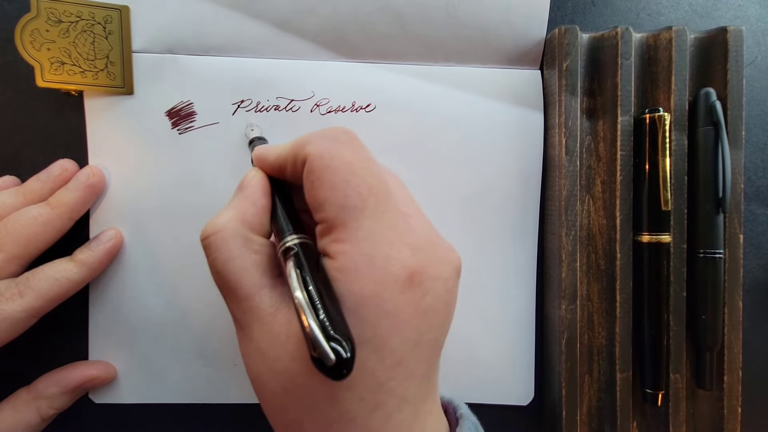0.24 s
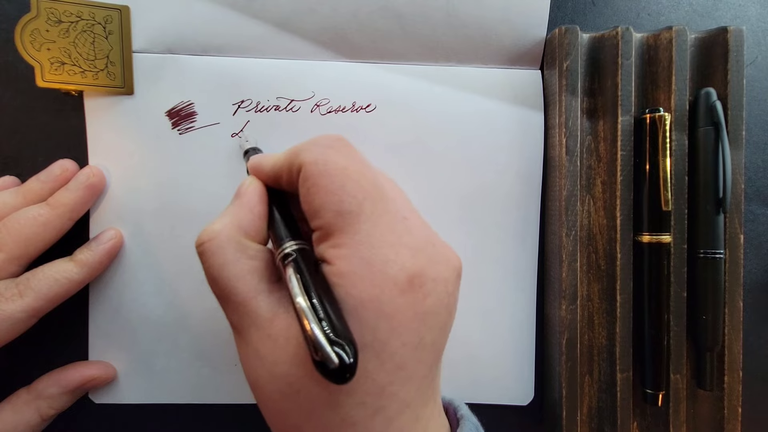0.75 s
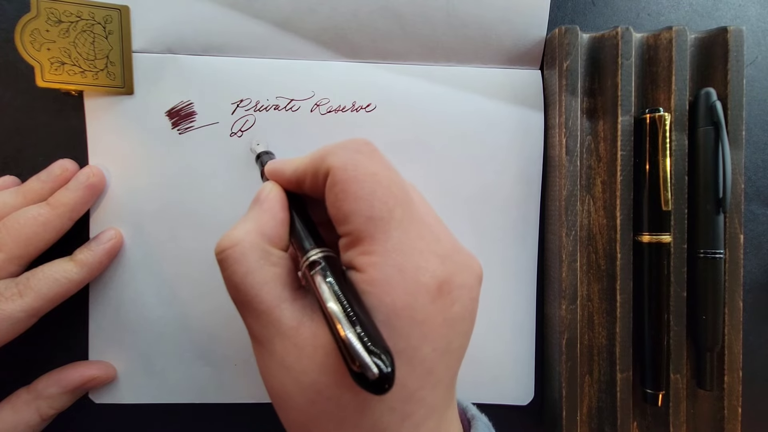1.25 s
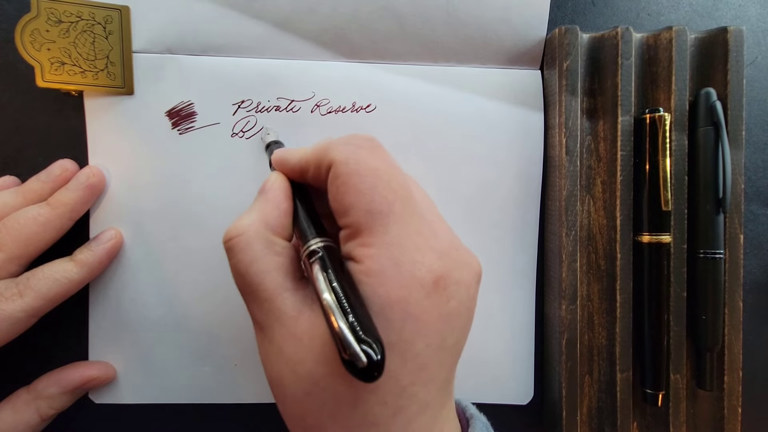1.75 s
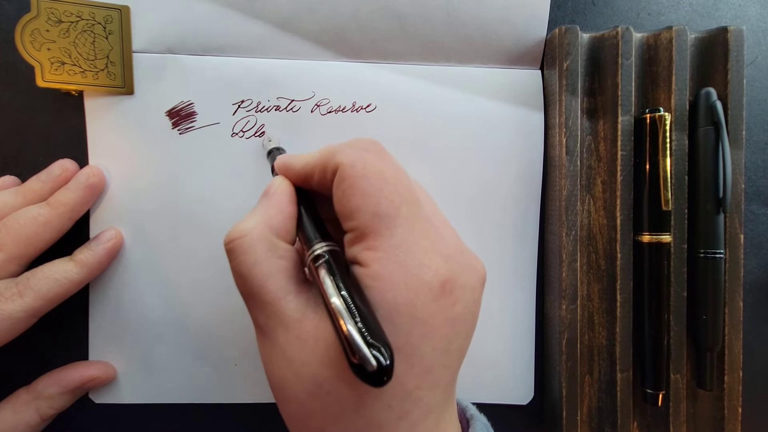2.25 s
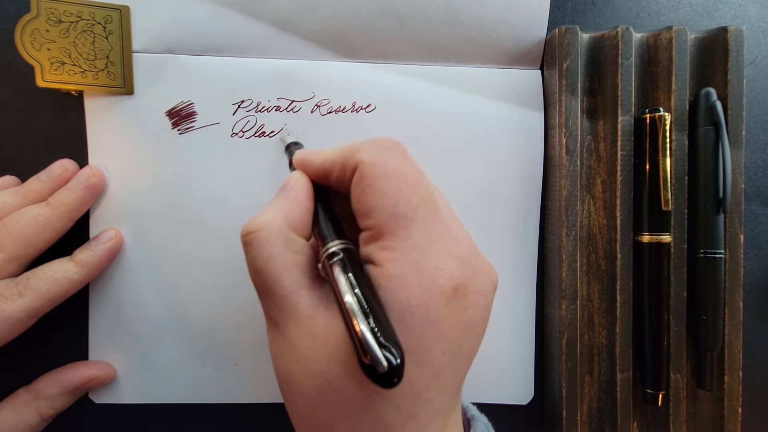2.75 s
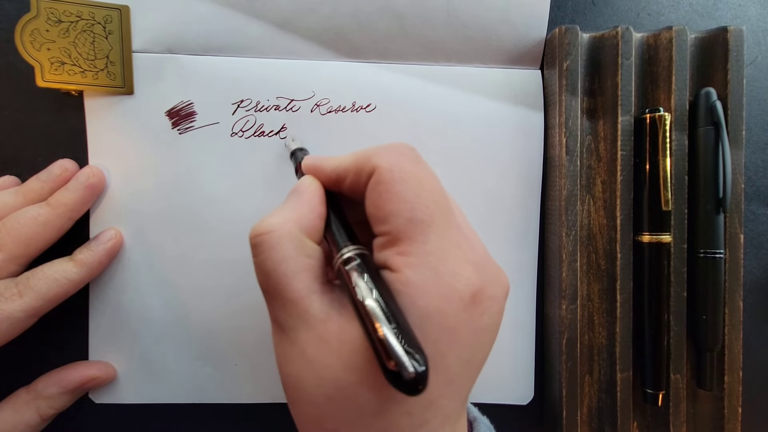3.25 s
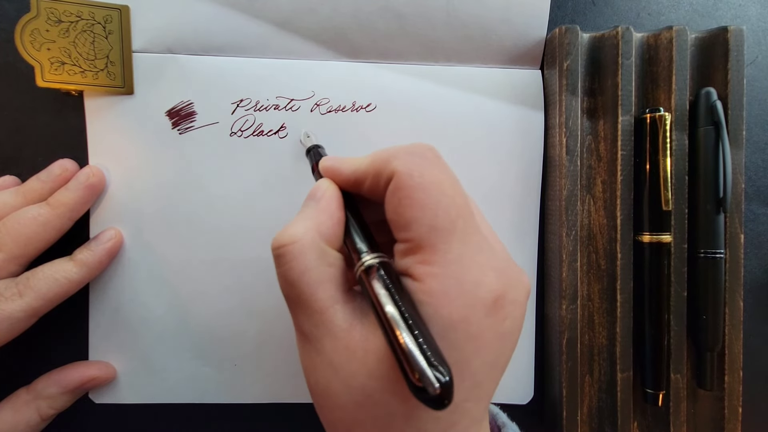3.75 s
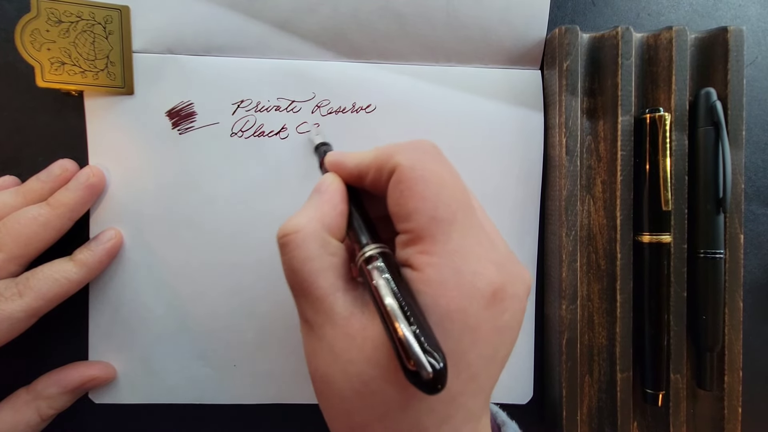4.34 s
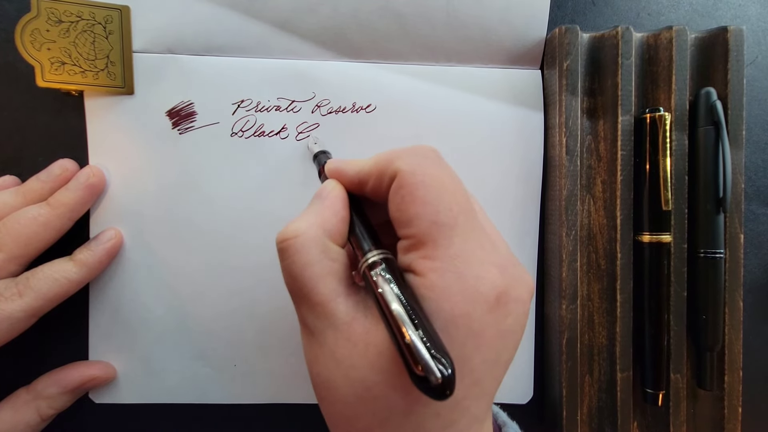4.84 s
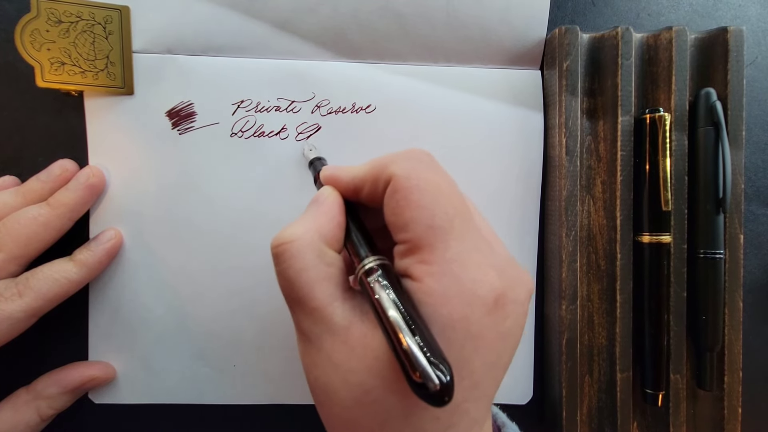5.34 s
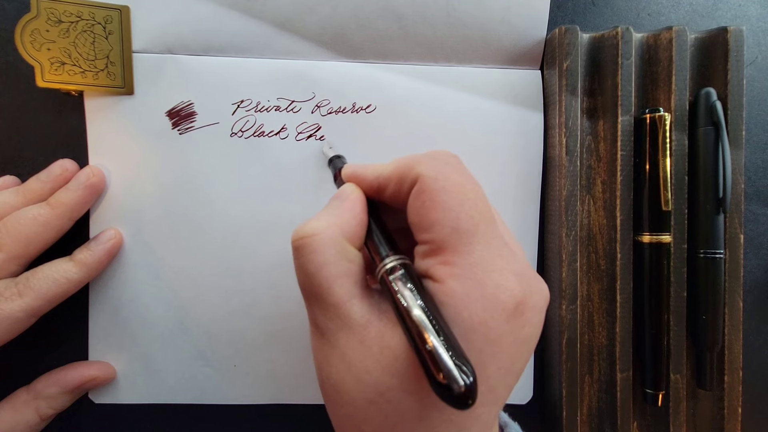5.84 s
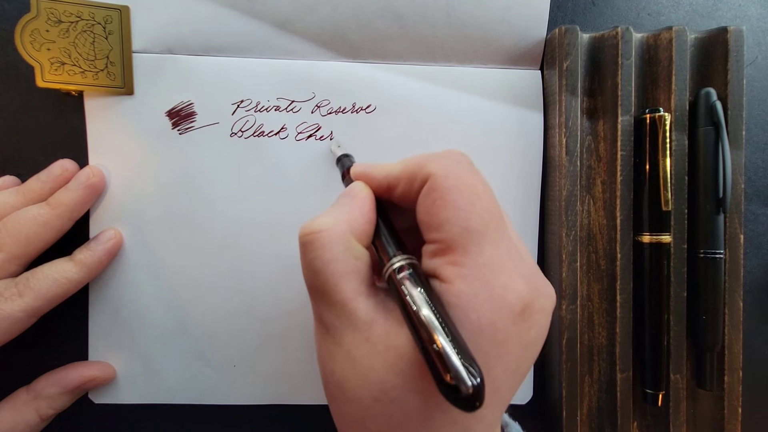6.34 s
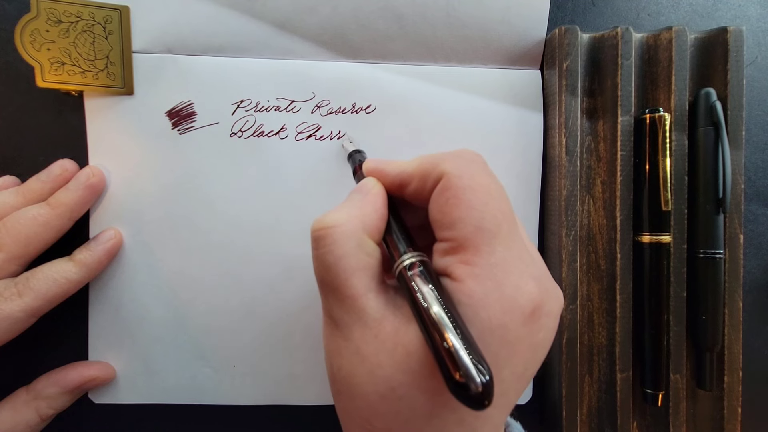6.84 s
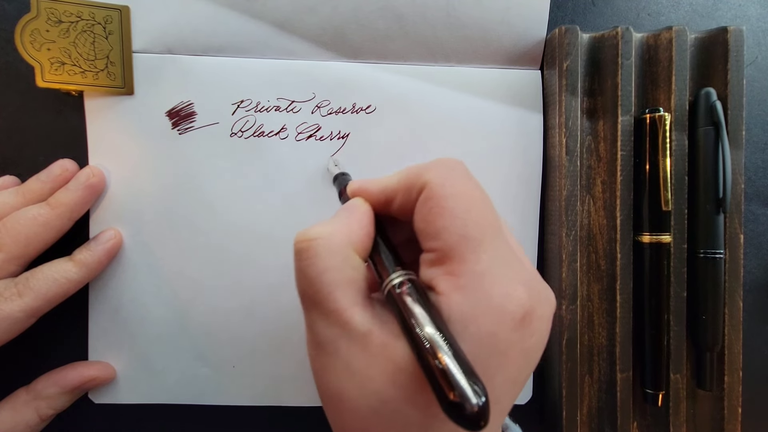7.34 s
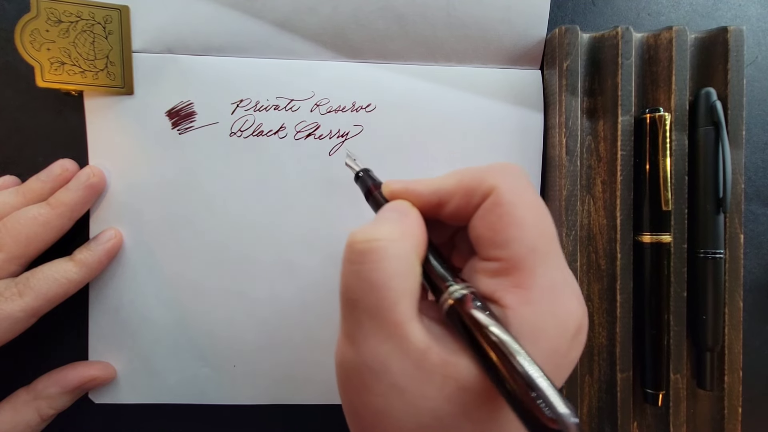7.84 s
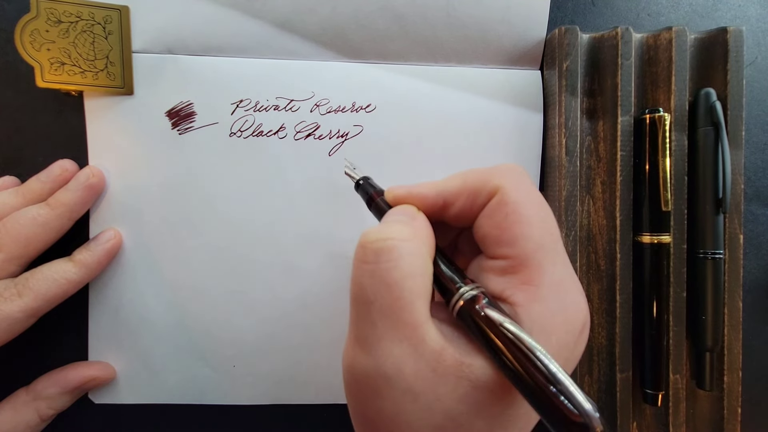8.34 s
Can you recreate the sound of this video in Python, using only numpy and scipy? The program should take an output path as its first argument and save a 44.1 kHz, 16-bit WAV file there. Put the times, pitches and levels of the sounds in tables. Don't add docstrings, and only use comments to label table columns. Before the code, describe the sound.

Close, dry nib scratches and small papery bumps come in quick bursts with pauses between, above a faint low hum that stops near the end.

```python
import sys
import numpy as np
from scipy import signal
from scipy.fft import rfft, irfft, next_fast_len
from scipy.io import wavfile
from scipy.ndimage import uniform_filter1d

SR = 44100
rng = np.random.default_rng(int(sys.argv[2]) if len(sys.argv) > 2 else 0)


def natural_amplitude(level_db):
    exponent = np.asarray(level_db, float) / 20
    return 10 ** exponent


def inscribe(sig):
    pcm = np.round(np.clip(np.atleast_2d(sig).T, -1, 1) * 32767)
    wavfile.write(sys.argv[1], SR, pcm.astype(np.int16))


N = 378818
T = np.arange(N) / SR
SIZE = next_fast_len(N, True)
HZ = np.maximum(np.fft.rfftfreq(SIZE, 1 / SR), 1)

# frequency in Hz, density in dB per Hz.
RUMBLE_COLOUR = [(12, -27.5), (25, -18), (43, -9.5), (65, -2.5), (108, -11.5), (135, -17.5), (205, -18.5),
                 (383, -34), (452, -39), (727, -45.5), (1600, -54), (2080, -70), (3520, -120)]
# centre in Hz, width in Hz, boost in dB.
ROOM_RESONANCES = [(57, 25, -5), (103, 22, 4.5), (171.1, 22, 9.5), (227, 8.6, 3), (1290, 390, 6)]
# time in seconds, pitch in Hz, level in dB.
MACHINE_HUM = [
    (0, 60.65, -46.5),
    (1, 60.7, -49),
    (2.001, 61.2, -46.5),
    (3.5, 61.17, -48.5),
    (5.001, 60.74, -47.5),
    (6.9, 60.26, -47.5),
    (7, 62.6, -68),
    (7.2, 60, -71.5),
    (8.6, 60, -67),
]
# centre in Hz, width in Hz, level in dB.
MACHINE_WHINES = [
    (119.9, 1.1, -63.5),
    (727.3, 18, -85.5),
]
# frequency in Hz, density in dB per Hz.
HISS_COLOUR = [(940, -30), (1600, -5), (2100, -9), (3500, -9), (5500, -20), (6060, -16.5), (7500, -29),
               (9500, -21.5), (13000, -12.5), (15800, -15.5)]
# frequency in Hz, left minus right in dB, likeness 0-1.
ROOM_AT_MICS = [(60, 1.5, 0.9), (131, 1, 1), (290, 3, 0.59), (620, 2, 0.082), (1370, 2.5, 0.067),
                (4000, -5, .05), (15000, 4, .05)]
# frequency in Hz, left minus right in dB, likeness 0-1.
PEN_AT_MICS = [(300, 5.5, 0.8), (980, 5, 0.97), (2360, 8, 0.32), (4180, 6.5, 0.23), (8000, 48, 0.5),
               (15200, 8.5, 0.5)]
# frequency in Hz, lag in seconds.
RIGHT_MIC_LAG = [(900, 0.00013), (1800, 0), (3200, 0), (15000, 0.0021)]
# fastest moment in seconds, rise in seconds, fall in seconds, level in dB.
HAND_SLIDES = [(0.0, 0.057, 0.18, -96.5), (0.355, 0.039, 0.141, -95), (2.3, 0.25, 0.25, -97),
               (4.1, 0.067, 0.1, -92.5), (6.15, 0.1, 0.1, -100), (1.251, 0.085, 0.065, -76.5),
               (1.37, 0.132, 0.23, -99.5), (3.564, 0.1, 0.042, -67), (3.786, 0.19, 0.082, -99),
               (3.823, 0.034, 0.069, -87), (4.815, 0.16, 0.1, -100), (7.832, 0.12, 0.069, -89.5),
               (8.034, 0.18, 0.034, -93)]
# frequency in Hz, density in dB per Hz.
SKIN_COLOUR = [(500, -14), (1300, -10.5), (3000, -11.5), (6360, -17), (9000, -13.5), (12900, -9),
               (15800, -16.5)]
# start in seconds, peak in dB, knock relative to it in dB.
DRY_TOUCHES = [
    (0.3366, -70, -7),
    (1.634, -75.5, -11),
    (4.0653, -63, -11),
]
# centre in Hz, width in Hz, level in dB.
TOUCH_MODES = [(4940, 2500, -23), (9200, 490, -4.5), (12600, 3700, -15)]
# centre in Hz, width in Hz, level in dB.
PAD_MODES = [
    [(565, 193, -7), (715, 46, 3), (821, 170, -5.5)],
    [(881, 42.5, -6.5), (952, 53, 3), (1030, 93, -1.5), (1107, 44, -6)],
    [(1160, 106, -4.5), (1367, 81, 2.5), (1474, 74, -3.5), (1662, 106, -7.5)],
]
# centre in Hz, width in Hz, level in dB.
SHEET_MODES = [
    [(2170, 350, -0.5), (2502, 124, -2.5), (2964, 435, -3), (3300, 225, 0.5), (3580, 210, -4.5)],
    [(4000, 320, -3), (4690, 420, -5), (4660, 107, -1.5), (5220, 590, -4), (5610, 860, -6)],
]
# centre in Hz, width in Hz, level in dB.
NIB_MODES = [(6860, 300, -9), (7070, 160, -2), (7500, 300, -7.5), (8960, 650, -2.5), (10210, 640, -5),
             (12100, 730, -12.5), (12600, 2000, -12)]
# centre in Hz, width in Hz, depth 0-1.
NIB_NOTCH = (8100, 1600, 0.85)
# fastest moment in seconds, rise in seconds, fall in seconds,
# pressure in dB, speed in dB.
FIRST_WORD_STROKES = [(0.456, 0.025, 0.053, 3, 7), (0.505, 0.027, .036, -2.5, -0.5),
                      (0.597, 0.033, 0.095, -13, -13.5), (0.718, 0.041, 0.091, -11.5, -13.5),
                      (0.953, 0.063, 0.038, 1, 1), (1.049, 0.047, 0.053, 4, 8.5),
                      (1.811, 0.041, 0.068, 1, 0.8), (1.957, .036, 0.053, 3.5, 0.5),
                      (2.112, 0.053, 0.029, -2.5, -5.5), (2.237, 0.053, 0.032, -4, -10.5),
                      (2.343, 0.045, .032, -3, -10.5), (2.423, 0.013, 0.025, 4.5, -11.5),
                      (2.542, 0.046, 0.025, -1.5, -5), (2.664, 0.054, 0.027, -2, -10),
                      (2.806, 0.076, 0.019, 1, -0.5), (2.917, 0.045, 0.035, 8, 0),
                      (3.052, 0.038, 0.037, 0, -5.5), (3.131, 0.021, 0.04, -0.5, -3.5),
                      (3.263, 0.025, 0.028, 0.5, -10), (3.326, 0.046, 0.028, -3.5, -7.5)]
SECOND_WORD_STROKES = [(4.158, 0.089, .015, -19, -25), (4.217, 0.053, 0.026, -1.5, -1.5),
                       (4.29, 0.14, 0.16, -6, -11), (4.347, 0.04, .055, 4.5, 2),
                       (4.498, 0.044, 0.033, 0.5, 7), (4.551, 0.034, 0.023, 5.5, 3.5),
                       (4.64, 0.053, 0.049, -1, -2.5), (5.285, 0.059, .025, 0, -8),
                       (5.389, 0.036, 0.068, 1.5, -2), (5.442, 0.031, 0.028, 5.5, -1),
                       (5.563, 0.037, .04, -1, -7), (5.666, 0.026, 0.025, 0, -14),
                       (5.797, 0.063, .025, -7, -11.5), (5.873, 0.028, 0.037, -3.5, -12.5),
                       (5.991, 0.048, 0.059, -2, -9.5), (6.321, 0.02, 0.017, 2.5, -14),
                       (6.34, 0.084, 0.077, -9, -26), (6.499, 0.047, 0.036, -1.5, -6.5),
                       (6.72, 0.097, .04, -11.5, -28.5), (6.749, 0.035, 0.051, -2.5, -19),
                       (6.92, 0.063, 0.057, -10.5, -19), (7.132, .039, 0.025, 4.5, -13.5),
                       (7.243, 0.044, 0.031, -4.5, -13)]
FLOURISH_STROKES = [(7.388, 0.047, 0.032, 9.5, -4.5), (7.44, 0.07, 0.032, 6, 9),
                    (7.547, 0.051, 0.11, 2.5, -7), (7.583, 0.049, 0.059, 3, 6),
                    (7.686, 0.035, 0.031, -7, -1.5)]
# time in seconds, peak in dB.
FIBRE_SNAGS = [(0.436, -45), (1.024, -44), (1.777, -51.5), (2.418, -43.5), (2.653, -43), (2.737, -46),
               (2.868, -47.5), (3.01, -47), (3.244, -48), (5.243, -62), (5.427, -53.5), (5.98, -51),
               (6.314, -42.5), (7.1, -52), (7.327, -45), (7.362, -40)]
# level in dB, dB per dB of pressure, dB per dB of speed.
PAD_LAWS = [
    (-68.5, 0.3, 0.47),
    (-61.5, 0.88, 0.05),
    (-60.5, 1.08, 0.19),
]
SHEET_LAWS = [
    (-62, 0.081, 1.04),
    (-71, -0.036, 1.5),
]
NIB_LAW = (-65.5, -0.059, 1)
HAND_LAW = (-77.5, -.1, 0.58)


def spectrum(x):
    return rfft(x, SIZE)


def wave(z):
    return irfft(z, SIZE)[..., :N]


def unit(x):
    return x / np.sqrt(np.mean(x ** 2))


def on_log(table, column):
    table = np.array(table)
    return np.interp(np.log(HZ), np.log(table[:, 0]), table[:, column])


def walk(rate):
    hold = int(SR / rate)
    levels = np.repeat(rng.standard_normal(N // hold + 1), hold)
    slewed = uniform_filter1d(uniform_filter1d(levels, hold), hold)
    return unit(slewed[:N])


def resonator(hz, width_hz):
    return 1j * HZ * width_hz / (hz ** 2 - HZ ** 2 + 1j * HZ * width_hz)


def ringing(drive, modes, wander_db):
    total, power = 0, 0
    for k, (hz, width_hz, db) in enumerate(modes):
        struck = spectrum(drive * natural_amplitude(wander_db * walk(13)))
        total = total + (-1) ** k * natural_amplitude(db) * resonator(hz, width_hz) * struck
        power += natural_amplitude(db) ** 2 * width_hz * np.pi / SR
    return total / np.sqrt(power)


def pair(spectra, table, lag_s):
    like = np.clip(on_log(table, 2), 0, 1)
    tilt = natural_amplitude(on_log(table, 1) / 2)
    delayed = spectra[0] * np.exp(-2j * np.pi * HZ * lag_s)
    right = like * delayed + np.sqrt(1 - like ** 2) * spectra[1]
    both = np.array([spectra[0] * tilt, right / tilt])
    return wave(both / np.sqrt((tilt ** 2 + tilt ** -2) / 2))


def rumble():
    boost_db = sum(db / (1 + (2 * (HZ - hz) / width_hz) ** 2) for hz, width_hz, db in ROOM_RESONANCES)
    noise = rng.standard_normal((2, N)) * natural_amplitude(1.6 * walk(3.3))
    coloured = spectrum(noise) * natural_amplitude(on_log(RUMBLE_COLOUR, 1) + boost_db)
    return unit(pair(coloured, ROOM_AT_MICS, 0)) * natural_amplitude(-50)


def microphone_hiss():
    hiss = spectrum(rng.standard_normal((2, N))) * natural_amplitude(on_log(HISS_COLOUR, 1))
    return unit(pair(hiss, ROOM_AT_MICS, 0)) * natural_amplitude(-87)


def machine():
    s, hz, db = np.transpose(MACHINE_HUM)
    phase = 2 * np.pi * np.cumsum(np.interp(T, s, hz)) / SR
    level = natural_amplitude(np.interp(T, s, db) + 1.1 * walk(4.1))
    tones = np.sqrt(2) * level * np.sin(phase + 0.037 * walk(3.6))
    for hz, width_hz, db in MACHINE_WHINES:
        narrow = spectrum(rng.standard_normal(N)) * resonator(hz, width_hz)
        tones = tones + natural_amplitude(db) * unit(wave(narrow))
    return tones * natural_amplitude(np.array([[.55], [-.55]]))


def reflections(t60_s, db):
    t = T[:SR // 2]
    decay = np.exp(-np.log(1000) * t / t60_s) * (t > .002)
    tail = rng.standard_normal((2, len(t))) * decay
    return 1 + spectrum(tail / np.sqrt(np.sum(tail ** 2) / 2)) * natural_amplitude(db)


def strokes(law):
    db, per_pressure, per_speed = law
    return [(s, rise, fall, db + per_pressure * pressure + per_speed * speed)
            for s, rise, fall, pressure, speed in FIRST_WORD_STROKES + SECOND_WORD_STROKES + FLOURISH_STROKES]


def swell(rows, stretch, edge):
    power = np.zeros(N)
    for s, rise, fall, db in rows:
        near = slice(max(int((s - .5) * SR), 0), int((s + .5) * SR))
        late = T[near] - s
        span = stretch * np.where(late < 0, rise, fall)
        power[near] += (natural_amplitude(db) * np.exp(-np.abs(late / span) ** edge)) ** 2
    return np.sqrt(power)


def hand():
    colour = natural_amplitude(on_log(SKIN_COLOUR, 1))
    colour = colour / np.sqrt(np.mean(colour ** 2))
    rub = rng.standard_normal((2, N)) * natural_amplitude(1.7 * walk(90))
    motion = swell(HAND_SLIDES + strokes(HAND_LAW), stretch=1.07, edge=2.4)
    return spectrum(rub * motion) * colour * natural_amplitude(6.0)


def dry_touches():
    crackle, knock = np.zeros((2, 2, N))
    t = T[:400]
    for s, db, knock_db in DRY_TOUCHES:
        chance = rng.standard_normal((2, len(t)))
        at = slice(int(s * SR), int(s * SR) + len(t))
        crackle[:, at] = natural_amplitude(db + 6.5) * chance * np.exp(-t / 0.0016)
        knock[:, at] = natural_amplitude(db + knock_db + 28.5) * chance * np.exp(-t / 0.001)
    return ringing(crackle, TOUCH_MODES, wander_db=-1) + spectrum(knock) * resonator(2300, 400) ** 2


def fibres(rate, scatter_db, judder_db):
    size_db = scatter_db * np.minimum(rng.exponential(size=(2, N)), 3)
    caught = rng.random((2, N)) < rate / SR
    catch = caught * natural_amplitude(size_db) * rng.standard_normal((2, N))
    rub = unit(catch) + 1.26 * rng.standard_normal((2, N))
    return unit(rub * natural_amplitude(judder_db * (walk(60) + walk(220))))


def snags():
    decay_s = 0.0035
    s, db = np.transpose(FIBRE_SNAGS)
    jerk = np.zeros(N)
    jerk[(s * SR).astype(int)] = natural_amplitude(db)
    return signal.lfilter([1], [1, -np.exp(-1 / SR / decay_s)], jerk)


def pad_thud(rub, jerk):
    pad = 0
    for law, modes in zip(PAD_LAWS, PAD_MODES):
        force = swell(strokes(law), stretch=0.94, edge=2.68) + natural_amplitude(-12) * jerk
        pad = pad + ringing(rub * force, modes, wander_db=2.0)
    return natural_amplitude(5.5) * pad / (1 + (520 / HZ) ** 4) / (1 + (HZ / 2100) ** 4)


def sheet_scratch(rub, jerk):
    sheet = 0
    for law, modes in zip(SHEET_LAWS, SHEET_MODES):
        force = swell(strokes(law), stretch=0.82, edge=2.3) + natural_amplitude(-33) * jerk
        sheet = sheet + ringing(rub * force, modes, wander_db=2.7)
    return natural_amplitude(5.0) * sheet / (1 + (1700 / HZ) ** 4)


def nib_ring(rub):
    hz, width_hz, depth = NIB_NOTCH
    nib = ringing(rub * swell(strokes(NIB_LAW), stretch=0.89, edge=2.77), NIB_MODES, wander_db=3.5)
    nib = nib * (1 - depth * resonator(hz, width_hz))
    return natural_amplitude(4.0) * nib / (1 + (5600 / HZ) ** 6)


def pen():
    rub = fibres(rate=2000, scatter_db=2.0, judder_db=1.49)
    jerk = snags()
    return pad_thud(rub, jerk) + sheet_scratch(rub, jerk) + nib_ring(rub)


def scene():
    background = rumble() + microphone_hiss() + machine()
    close = pair(hand() + dry_touches() + pen(), PEN_AT_MICS, on_log(RIGHT_MIC_LAG, 1))
    return background + wave(spectrum(close) * reflections(t60_s=0.16, db=-10.5))


def low_pass(x):
    return signal.sosfilt(signal.butter(12, 15940, fs=SR, output="sos"), x)


def record(dry):
    mix = wave(spectrum(dry) * (HZ < 15750))
    return low_pass(mix)


dry = scene()
out = record(dry)
inscribe(out)
```